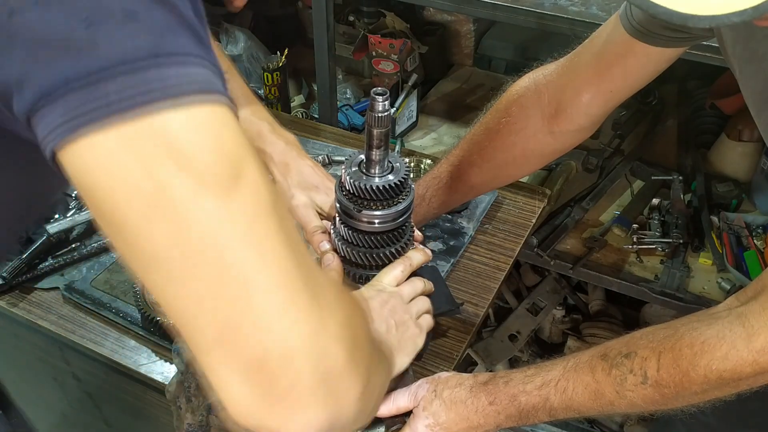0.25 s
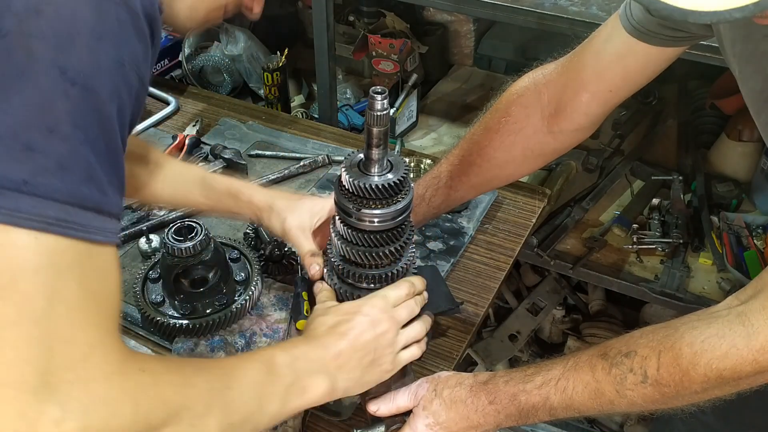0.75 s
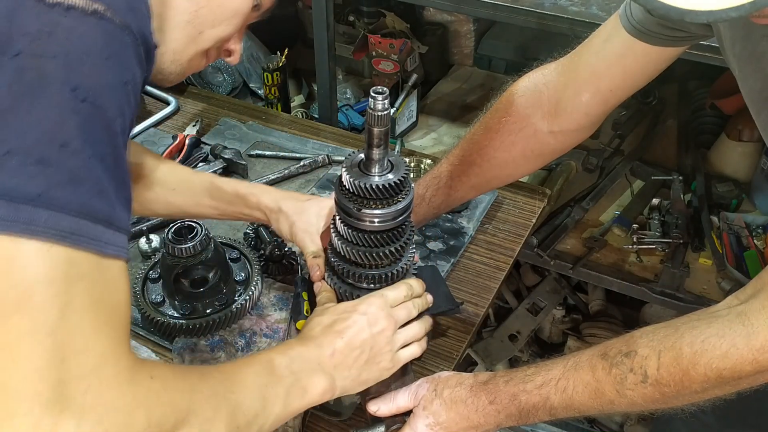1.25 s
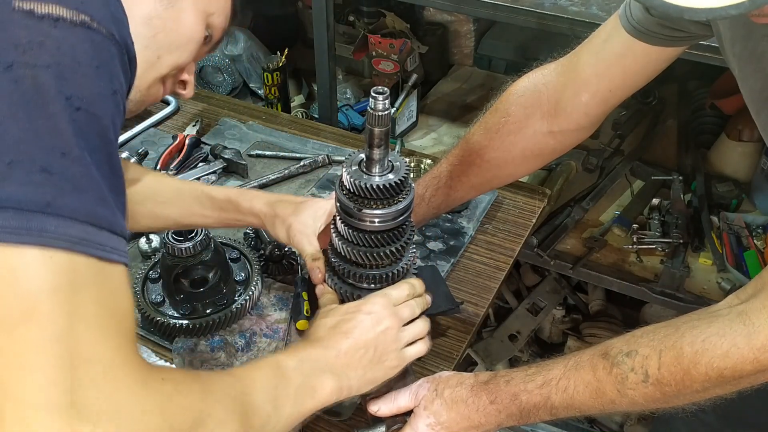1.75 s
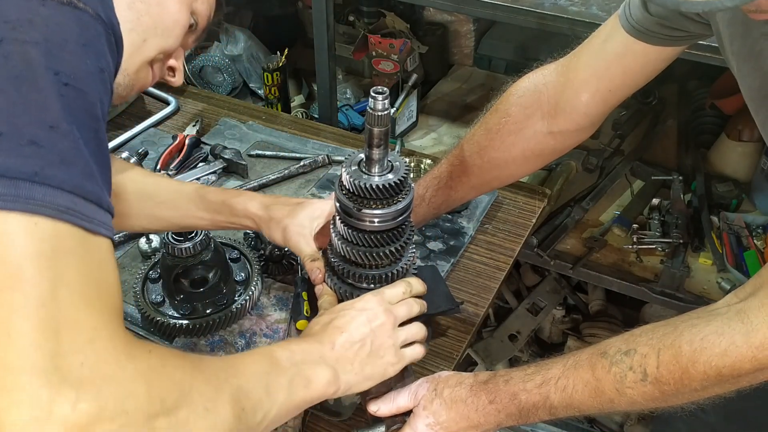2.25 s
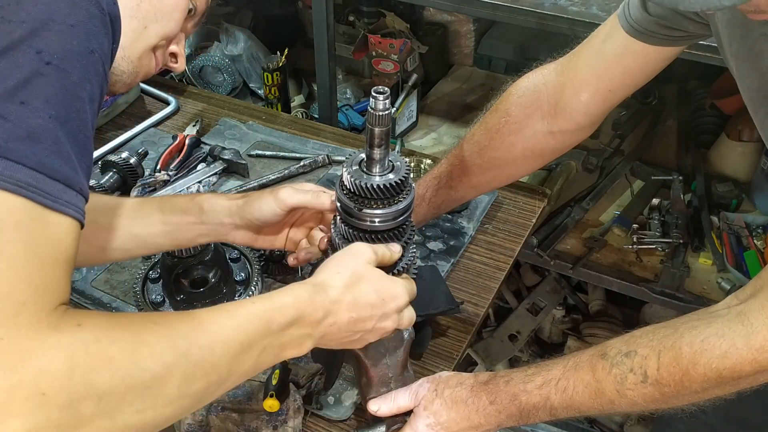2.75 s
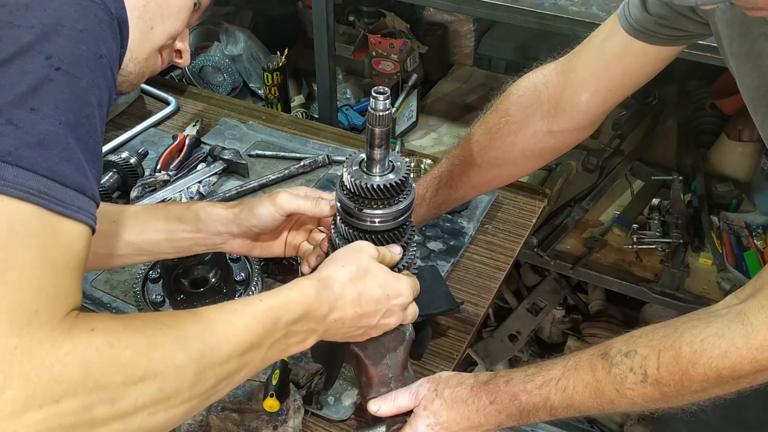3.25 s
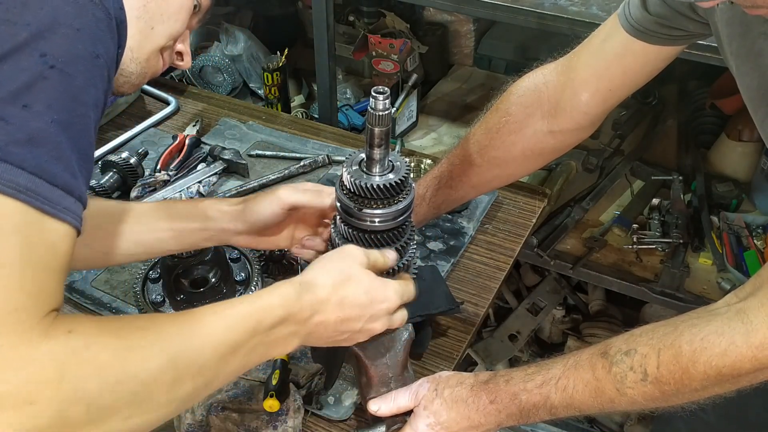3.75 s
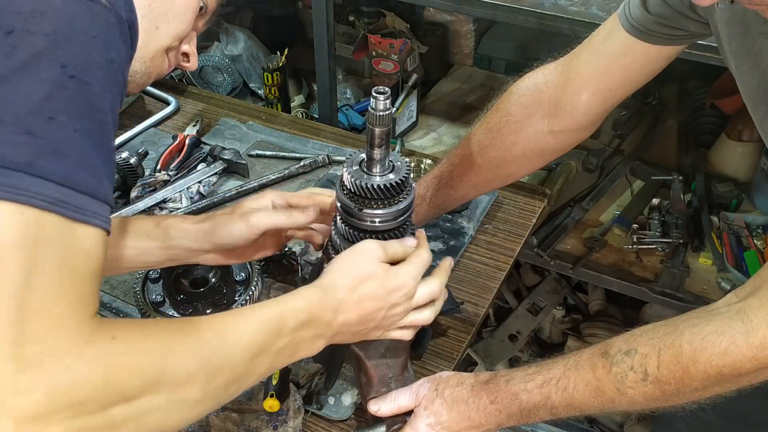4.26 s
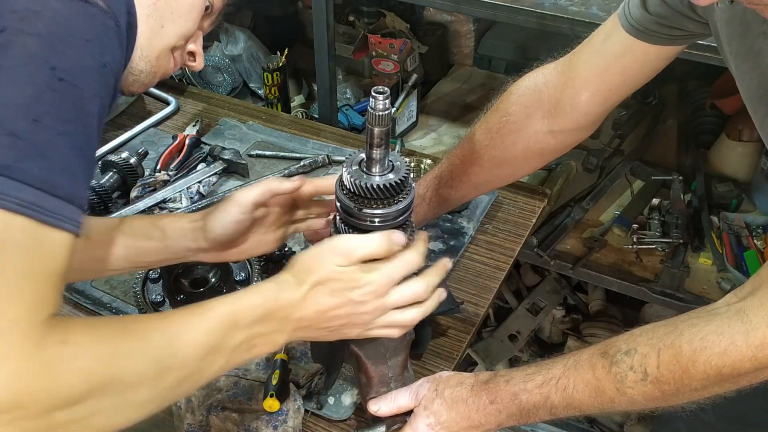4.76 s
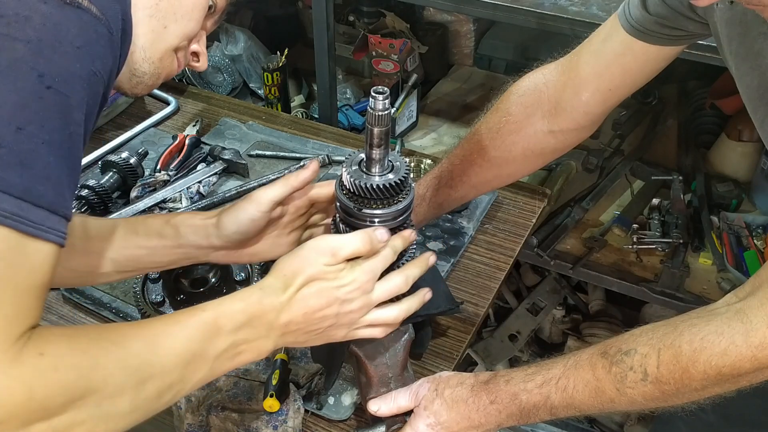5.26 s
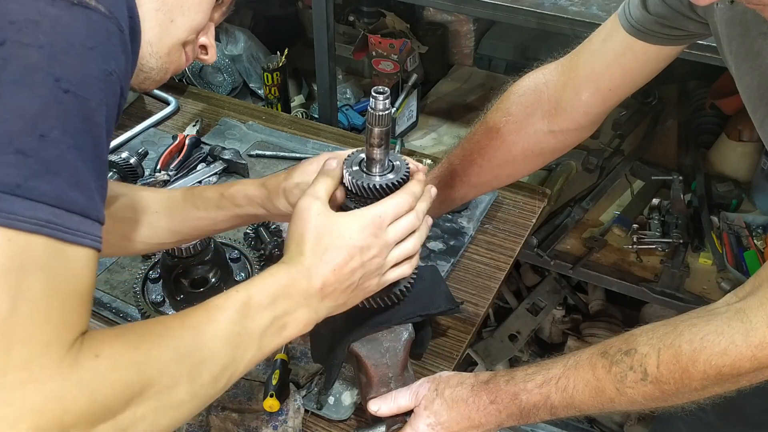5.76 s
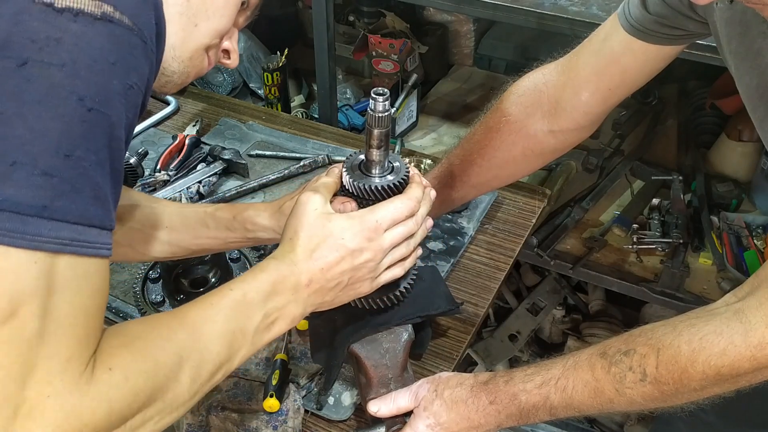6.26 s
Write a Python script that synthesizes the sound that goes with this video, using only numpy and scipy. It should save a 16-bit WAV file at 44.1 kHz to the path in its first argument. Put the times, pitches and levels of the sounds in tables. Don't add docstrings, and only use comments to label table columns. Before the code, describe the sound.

Close, sharp metal clinks with long quiet gaps: a snap, spaced knocks, a gear clank, a bright clack, ticks and a final stack slam.

```python
import sys
import numpy as np
from scipy import signal
from scipy.fft import rfft, irfft
from scipy.io import wavfile
from scipy.ndimage import uniform_filter1d

SR = 44100
rng = np.random.default_rng(int(sys.argv[2]) if len(sys.argv) > 2 else 0)


def int16_out(signal):
    q = np.round(np.clip(np.atleast_2d(signal).T, -1, 1) * 32767)
    wavfile.write(sys.argv[1], SR, q.astype(np.int16))


def to_linear_factor(level_db):
    exponent = np.asarray(level_db, float) / 20
    return 10 ** exponent


N = 286650
LEAD = 441

# hz, level_db, t60_s
BENCH_MODES = [(206, -8.5, 0.055), (470, 13.5, 0.066)]
# hz, level_db, t60_s
TOOTH_MODES = [(2240, -7, 0.017), (4440, -13, 0.013), (11800, -3, 0.021)]


def rms_one(x):
    return x / np.sqrt(np.mean(x ** 2) + 1e-20)


def at_hz(points, hz):
    point_hz, value = np.transpose(points)
    return np.interp(np.log(hz), np.log(point_hz), value)


def noise(spectrum, alike, low_hz):
    hz = np.arange(1, N // 2 + 2) * SR / N
    mid, side = rfft(rng.standard_normal((2, N))) * to_linear_factor(at_hz(spectrum, hz))
    likeness = np.clip(at_hz(alike, hz), 0, 1)
    pair = np.sqrt(1 + likeness) * mid + np.sqrt(1 - likeness) * side * [[1], [-1]]
    audible = irfft(pair * (hz > low_hz), N)
    return irfft(pair, N) / np.sqrt(np.mean(audible ** 2))


def pulse(spectrum, tilt_db, size=2048):
    hz = np.arange(1, size // 2 + 2) * SR / size
    level = np.log(to_linear_factor(at_hz(spectrum, hz) + tilt_db * np.log2(hz / 4000)))
    cepstrum = irfft(level, size)
    cepstrum[1:size // 2] *= 2
    cepstrum[size // 2 + 1:] = 0
    return irfft(np.exp(rfft(cepstrum)), size)


def chattering(chatter_s):
    bounces = rng.standard_normal(1024) * np.exp(-np.arange(1024) / SR / chatter_s)
    bounces[0] = 1.8
    spectrum = rfft(bounces, 2048)
    return irfft(spectrum / np.abs(spectrum))[:1024]


def strikes(contacts, crack, modes, chatter_s, lag, ring_share=0.39):
    late_s = .001
    out = np.zeros((2, N + LEAD + SR))
    t = np.arange(SR // 3) / SR
    hz, mode_db, t60 = np.transpose(modes)[:, :, None]
    phase = rng.uniform(-2.3, 1, (2, *hz.shape)) * np.clip(hz / 2500, 0, np.pi)
    for s, peak_db, pan_db, tilt_db, ring_db in contacts:
        hit = np.convolve(chattering(chatter_s), pulse(crack, tilt_db))
        strength_db = mode_db + ring_db + tilt_db * np.log2(hz / 4000)
        strength_db = strength_db + rng.normal(0, 1.5, (2, *hz.shape))
        pitch = hz * (1 + 0.00093 * rng.standard_normal(hz.shape))
        swing = np.exp((2j * np.pi * pitch - np.log(1000) / (ring_share * t60)) * t)
        start = (to_linear_factor(strength_db) * np.exp(1j * phase))[..., 0]
        sound = (start @ swing).imag * (1 - np.exp(-t / 0.0002))
        sound[:, :len(hit)] += hit / np.max(np.abs(hit))
        left_at = round((s + late_s) * SR) + LEAD + lag
        right_at = left_at - lag
        out[0, left_at:left_at + len(t)] += to_linear_factor(peak_db + pan_db) * sound[0]
        out[1, right_at:right_at + len(t)] += to_linear_factor(peak_db) * sound[1]
    return out[:, :N + LEAD]


def garage():
    # hz, t60_s
    walls = [(150, 0.34), (500, .23), (1500, .32), (4000, 0.3), (9000, 0.26), (14000, 0.18)]
    # delay_s, left_db, right_db
    echoes = [(.0042, -5, -7), (.0085, -3.5, -13), (0.01, -19, -21.5)]
    t, tail = np.arange(SR // 2) / SR, 0
    white = rng.standard_normal((2, 3, len(t)))
    for k, hz in enumerate(90 * 2 ** np.arange(0, 7.6, .5)):
        sos = signal.butter(2, [hz / 2 ** .25, hz * 2 ** .25], "band", fs=SR, output="sos")
        both, left, right = signal.sosfilt(sos, white[k % 2])
        shared = np.clip(200 / hz, 0, 1) ** .5
        band = shared * both + np.sqrt(1 - shared ** 2) * np.array([left, right])
        tail = tail + band * to_linear_factor(-60 * t / at_hz(walls, hz))
    tail = tail * (1 - np.exp(-(t / .0045) ** 2))
    clumps = rms_one(uniform_filter1d(rng.standard_normal(tail.shape), size=70))
    tail = tail * to_linear_factor(2.5 * clumps)
    tail = tail / np.sqrt(np.mean(np.sum(tail ** 2, axis=1)))
    for s, left_db, right_db in echoes:
        tail[:, round(s * SR)] += to_linear_factor([left_db, right_db])
    return tail


def ring_snap():
    # start_s, peak_db, left_right_db, bright_db_per_octave, ringing_db
    snap = [
        (-.007, -1, -0.5, -0.6, -9.5),
        (.0, -8, 2, -4.5, -17),
        (.002, -7.5, 3, 1, -15),
        (.0045, -11, 2.5, -1, -17.5),
        (.018, -15.5, -1, -1.5, -14.5),
        (.024, -19.5, -0.5, -1.5, -14.5),
        (.037, -16.5, 0, -1.2, -13.5),
    ]
    # hz, db_per_hz
    snap_crack = [(90, -44.5), (250, -30), (600, -28.5), (1200, -12.5), (1900, -24.5), (3000, -7.5),
                  (4600, -3), (6200, -11), (7600, -3.5), (8300, -12.5), (9100, 0), (10000, -26),
                  (16000, -25)]
    # hz, level_db, t60_s
    snap_modes = [(1200, -19.5, .2), (3219, -15, .08), (4250, -7, .06), (4300, -9.5, .08), (4764, -10, .06),
                  (4860, -8.5, 0.055), (5405, -12.5, 0.066), (6844, -14.5, .06), (7523, -4, .1),
                  (7730, 0, 0.15), (8858, -5.5, .08), (9006, -0.5, .1), (9290, 3, .08), (9270, -4.5, 0.082),
                  (10390, -16, .05), (10730, -14, 0.16), (11460, -18, 0.086), (12320, -18, .1),
                  (13200, -18.5, .12), (13500, -15, .1), (14200, -17, .12), (15650, -10, 0.11)]
    return strikes(snap, snap_crack, snap_modes, 0.0017, lag=2), 3.0


def hum():
    # time_s, hum_db
    load = [(0.0, -61.5), (2.41, -56), (6.5, -62)]
    # hz, width_hz, level_db
    booms = [(65, 14, 0), (82, 17, -1.5), (107.37, 3.2, 1)]
    motor_hz, motor_db = 434, -72.5
    start_s, stop_s, fade_s = 2.1, 2.5, 0.051
    white, out, t = rng.standard_normal((2, N)), 0, np.arange(N) / SR
    for hz, width_hz, level_db in booms:
        sos = signal.butter(2, [hz - width_hz / 2, hz + width_hz / 2], "band", fs=SR, output="sos")
        out = out + to_linear_factor(level_db) * signal.sosfilt(sos, white)
    mid, side = rms_one(out)
    rumble = (mid + 0.57 * side * [[1], [-1]]) * to_linear_factor([[1.1], [-1.1]])
    rumble = rumble * to_linear_factor(np.interp(t, *np.transpose(load)) + 0.5)
    running = np.clip(1 + np.minimum(t - start_s, stop_s - t) / fade_s, 0, 1)
    return rumble + to_linear_factor(motor_db) * running * np.sin(2 * np.pi * motor_hz * t)


def hiss():
    # hz, db_per_hz
    colour = [(15, -50.5), (25, -25.5), (45, -6), (97, 0), (130, -17), (185, -17), (218, -21), (264, -22.5),
              (418, -23), (478, -23.5), (627, -23), (2500, -32.5), (9930, -38.5), (16200, -44.5)]
    # hz, likeness (1 = same)
    likeness = [(60, 1), (180, 1), (550, 0.28), (1650, -0.048), (4970, -1.1), (15000, 0.13)]
    level_db = -64
    air = noise([(hz, min(db, -12.0)) for hz, db in colour], likeness, 84.0)
    return to_linear_factor(level_db) * air * to_linear_factor([[.6], [-.6]])


def hands():
    # hz, db_per_hz
    rub_colour = [(200, -15), (500, -6.5), (1500, -4), (2200, -3), (2900, -2), (5000, -3.5), (8000, -1.5),
                  (11000, -5), (16000, -12)]
    # firmest_s, length_s, rub_db, bright_db_per_octave
    strokes = [(0.338, 0.05, -64.5, -10.5), (0.403, 0.048, -53.5, 1.5), (0.465, 0.51, -59.5, 3),
               (0.611, 0.095, -54, -2), (0.789, 0.085, -53.5, -1.5), (1.003, 0.064, -51, 12.5),
               (1.04, 0.11, -49, -4), (2.954, 0.21, -65, -4.5), (4.107, 0.082, -71.5, 7.5),
               (4.31, 0.32, -74, 8.5), (4.617, 0.34, -70, 1), (4.945, 0.17, -73.5, 4),
               (5.834, 0.087, -73.5, 0), (6.014, 0.11, -65.5, -1.5)]
    grip_share = 0.39
    range_db = 21
    rub = noise(rub_colour, [(300, 1.0), (3000, 0.084), (12000, 0.07)], 2300.0)
    dull = signal.sosfilt(signal.butter(1, 4000, fs=SR, output="sos"), rub)
    grain = to_linear_factor(.9 * rms_one(uniform_filter1d(rng.standard_normal(N), size=200)))
    low, high, t = 0, 0, np.arange(N) / SR
    for s, length_s, rub_db, tilt_db in strokes:
        away = np.maximum((s - t) / grip_share, t - s) / length_s
        grip = to_linear_factor(rub_db - range_db * away)
        low = low + grip / to_linear_factor(tilt_db)
        high = high + grip * to_linear_factor(tilt_db)
    low, high = uniform_filter1d(low, size=600), uniform_filter1d(high, size=600)
    return (low * dull + high * (rub - dull)) * grain


def bench_thuds():
    # start_s, peak_db, left_right_db, bright_db_per_octave, ringing_db
    thuds = [
        (.603, -48, 1.9, 1, -16),
        (2.545, -55.5, 1.5, -0.17, -39),
        (3.312, -35.5, 0.65, -0.37, -23),
        (3.47, -55, 1.5, 0.21, -30),
    ]
    # hz, db_per_hz
    thud_crack = [(70, -48.5), (140, 1), (220, 10.5), (450, -2.5), (750, -2), (1500, -9.5), (5000, -48.5)]
    return strikes(thuds, thud_crack, BENCH_MODES, 0.00096, lag=1), 1.5


def ring_rocking():
    # start_s, peak_db, left_right_db, bright_db_per_octave, ringing_db
    rocks = [
        (.9095, -44, -0.45, -0.87, -4),
        (1.2012, -28.5, -0.45, 1, -14.5),
        (1.4908, -28, .3, -0.4, -14.5),
        (1.7658, -32, .3, 1, -10),
        (2.0433, -37.5, -.4, .3, -16),
    ]
    # start_s, peak_db, left_right_db, bright_db_per_octave, ringing_db
    rocks_back = [
        (1.351, -44, 0.22, -5.5, -19.5),
        (1.617, -45, 1.6, -4, -17.5),
        (1.631, -48, 1.1, -3.5, -22),
        (1.923, -46, 1.5, -3, -20),
    ]
    # hz, db_per_hz
    rock_crack = [(180, -25), (500, -12), (1100, -4.5), (2300, -6), (3400, -7), (4500, 6), (5600, -7),
                  (7500, -16), (10200, -38), (16000, -29)]
    # hz, level_db, t60_s
    rock_modes = [(1080, -8, 0.035), (2620, -3, 0.046), (2830, -2, 0.055), (2946, 1.5, 0.046),
                  (3160, 4, 0.044), (3800, 9.5, 0.031), (4210, 9.5, 0.015), (4660, 9, 0.019),
                  (4990, 6, 0.016), (5360, -7, 0.024), (7380, -7.5, 0.034), (7480, -3, 0.038),
                  (9130, -8.5, 0.19)]
    # hz, db_per_hz
    seat_crack = [(300, -8), (700, -5.5), (1150, 3.5), (1900, -8), (4000, -6.5), (9000, -35.5)]
    seat_s, seat_loss_db = .008, 11
    seats = [(s + seat_s, peak_db - seat_loss_db, pan_db, 0, -40) for s, peak_db, pan_db, *_ in rocks]
    return [(strikes(rocks, rock_crack, rock_modes, 0.00077, lag=1), -4.5),
            (strikes(seats, seat_crack, BENCH_MODES, 0.0013, lag=1), -1.5),
            (strikes(rocks_back, rock_crack, rock_modes, 0.0014, lag=1), 3.5)]


def gear_nudge():
    # start_s, peak_db, left_right_db, bright_db_per_octave, ringing_db
    nudge = [
        (2.539, -37, 1.4, -1.27, -9),
        (2.546, -46, 1.5, 4, -14),
        (2.558, -44, .6, -2.3, -16),
        (2.572, -36, 1, -9.5, -17),
        (2.589, -35.5, 0.96, 0.4, -24),
        (2.597, -37, 1, -1.5, -14),
        (2.609, -31.5, 1.5, 3.5, 0),
    ]
    # hz, db_per_hz
    nudge_crack = [(76, -2), (140, 7), (430, 2.5), (1300, -10.5), (3000, -3.5), (4900, -14), (6300, -10),
                   (7400, -23), (10000, -28), (13000, -35), (16000, -31.5)]
    # hz, level_db, t60_s
    nudge_modes = [(430, -6.5, .12), (1600, -2, 0.04), (1960, -4, 0.04), (2800, -23, 0.052),
                   (3160, 0, 0.06), (3820, -10, 0.042), (4890, 1, 0.045), (7435, -2, 0.084),
                   (8060, -5.5, 0.09), (9100, -15, 0.081), (10000, -15, .07), (10440, -14, 0.083),
                   (12413, -15, .05), (15320, -17.5, .05)]
    return strikes(nudge, nudge_crack, nudge_modes, 0.002, lag=4), 3.5


def gear_clank():
    # start_s, peak_db, left_right_db, bright_db_per_octave, ringing_db
    clank = [
        (2.634, -18.5, 3, 0.22, -6),
        (2.644, -11.5, 1.5, 0.94, -18.5),
        (2.666, -22.5, 0.5, -1.5, -6.5),
    ]
    # hz, db_per_hz
    clank_crack = [(60, -23), (150, 0.5), (300, -5), (540, 3.5), (900, -13.5), (1400, -8), (3200, -9.5),
                   (4000, -21.5), (6500, -19), (9500, -23), (16000, -31.5)]
    # hz, level_db, t60_s
    gear_modes = [(433, -20, 0.37), (555, -8.5, 0.11), (1323, 0.5, 0.053), (1616, -17.5, 0.38),
                  (1865, -15, .1), (2170, -15, 0.3), (2212, -10, 0.347), (2900, -17, .12),
                  (3075, -2.5, .15), (3210, -7, 0.11), (3726, -11, 0.086), (4190, -7, 0.095),
                  (4890, -15, 0.15), (5500, -16, 0.11), (5870, -5, 0.21), (5890, -18.5, .14),
                  (5880, -17, .1), (7410, -17, 0.084), (8200, -16, 0.17), (8860, -16, 0.2),
                  (9109, -17, 0.22), (9270, -14, 0.15), (9900, -3, 0.17), (10370, -9.5, 0.16),
                  (11130, -13, 0.12), (12725, -13, .13), (13260, -13.5, 0.12), (13980, -21.5, 0.12),
                  (14540, -21.5, .1), (15500, -16, .035)]
    return strikes(clank, clank_crack, gear_modes, 0.004, lag=4, ring_share=0.82), -1.5


def light_touches():
    # start_s, peak_db, left_right_db, bright_db_per_octave, ringing_db
    touches = [
        (3.073, -46, 1.2, -1.9, -5.5),
        (3.237, -55, 1.14, 0.84, -14),
        (6.337, -37.5, 0.63, -0.65, -23),
    ]
    # hz, db_per_hz
    touch_crack = [(900, -44), (2500, -15.5), (4200, 3), (6000, -8), (8000, 0.5), (10000, -14), (12500, -7),
                   (16000, -27.5)]
    return strikes(touches, touch_crack, TOOTH_MODES, 0.00067, lag=1), 3.5


def sleeve_clack():
    # start_s, peak_db, left_right_db, bright_db_per_octave, ringing_db
    clack = [
        (3.2918, -6, 4.0, 0.67, -12),
        (3.297, -8, 3.6, .6, -18.5),
        (3.301, -3.5, 2.6, 0.55, -22),
        (3.318, -26.5, 3.0, -0.72, -22.5),
    ]
    # hz, db_per_hz
    clack_crack = [(150, -37.5), (500, -34.5), (1200, -19), (2200, -23.5), (3500, -11.5), (5200, -17.5),
                   (7000, -4), (9500, 3.5), (12000, -3), (14500, -6), (16000, -4)]
    # hz, level_db, t60_s
    sleeve_modes = [(3570, -13, 0.16), (3840, -16, 0.07), (4129, -11, 0.15), (4540, -13, 0.2),
                    (5040, -12.5, 0.08), (5580, -12, 0.06), (5846, -12, 0.15), (6300, -12, .12),
                    (6702, -11.5, .1), (6918, -8.5, 0.16), (7270, -8, 0.12), (8350, -4.5, 0.065),
                    (8632, -3, 0.07), (8700, 12, 0.0077), (8750, 0.5, .07), (9800, 0.5, 0.14),
                    (9625, -6, .08), (10257, -1.5, 0.09), (10180, -3.5, .07), (11160, -3, 0.065),
                    (13670, -9.5, 0.097), (13800, -13, .08)]
    return strikes(clack, clack_crack, sleeve_modes, 0.003, lag=1, ring_share=0.35), -1.5


def sleeve_settle():
    # start_s, peak_db, left_right_db, bright_db_per_octave, ringing_db
    settle = [
        (3.463, -30.5, 3.43, 0.34, -3.5),
    ]
    # hz, db_per_hz
    settle_crack = [(500, -30), (1500, -17.5), (3500, 0), (6000, -6.5), (11000, -1), (12500, -25),
                    (16000, -25.5)]
    # hz, level_db, t60_s
    settle_modes = [(3300, -18, 0.02), (6200, 3.5, 0.022), (9300, -7, 0.034), (11430, -4, 0.074),
                    (15550, -8, 0.032)]
    return strikes(settle, settle_crack, settle_modes, 0.00147, lag=1), 0.5


def tooth_tap():
    # start_s, peak_db, left_right_db, bright_db_per_octave, ringing_db
    tap = [
        (4.149, -46, 1.6, 0.48, -24.5),
    ]
    # hz, db_per_hz
    tap_crack = [(900, -33), (1800, -16), (2300, 4), (3300, -6.5), (5000, -14.5), (9000, -15), (16000, -30)]
    return strikes(tap, tap_crack, TOOTH_MODES, 0.0016, lag=1), 4.5


def tooth_ticks():
    # start_s, peak_db, left_right_db, bright_db_per_octave, ringing_db
    ticks = [
        (5.095, -23, 3.4, -1.58, -7.5),
        (5.291, -16, 3.34, 0.75, -8),
    ]
    # hz, db_per_hz
    tick_crack = [(400, -38), (1200, -19.5), (2300, -16), (3300, -11.5), (4700, -6), (7500, -1), (9500, -4),
                  (11800, -2.5), (13500, -13.5), (16000, -10)]
    return strikes(ticks, tick_crack, TOOTH_MODES, 0.00015, lag=1), -2.5


def stack_slam():
    # start_s, peak_db, left_right_db, bright_db_per_octave, ringing_db
    slam = [
        (6.3462, -2, 3.2, .3, -6.5),
        (6.354, -2.5, 1.3, 0.43, -11.5),
        (6.361, -2, 1.7, -1.2, -25),
        (6.371, -12.5, 1.2, -0.072, -13),
        (6.386, -13.5, 1.7, 0, -12),
        (6.395, -16.5, 1.7, 0, -14),
        (6.402, -15, 1.5, -0.24, -12.5),
        (6.417, -19.5, 3.4, 0, -16.5),
        (6.444, -27.5, 1.6, .3, -14),
    ]
    # hz, db_per_hz
    slam_crack = [(60, -53.5), (200, -18), (600, -12.5), (1200, -10.5), (2100, -12), (3500, -3), (5500, -7),
                  (6800, -2.5), (8200, -16.5), (9300, -1), (10200, -14.5), (11200, -6.5), (16000, -24.5)]
    # hz, level_db, t60_s
    stack_modes = [(3200, -11.5, .07), (3499, -5.5, 0.1), (3830, -10.5, 0.029), (4449, -9, 0.06),
                   (4730, -9.5, 0.031), (5246, -11, .05), (5749, -11.5, 0.017), (6473, -8, .04),
                   (6675, -8, 0.039), (7240, -5.5, 0.064), (7590, -18.5, .06), (9070, -5.5, 0.14),
                   (9230, -4, 0.15), (9287, -2, 0.14), (9496, -4.5, 0.08), (9746, -9, 0.026),
                   (11600, -11, 0.035), (11030, -4.5, .05), (12650, -15.5, .05), (13600, -18, 0.033)]
    return strikes(slam, slam_crack, stack_modes, 0.0012, lag=2), 2.2


def parts():
    kinds = [ring_snap(), bench_thuds(), *ring_rocking(), gear_nudge(), gear_clank(), light_touches(),
             sleeve_clack(), sleeve_settle(), tooth_tap(), tooth_ticks(), stack_slam()]
    direct = sum(sound for sound, room_db in kinds)
    sent = sum(sound * to_linear_factor(room_db) for sound, room_db in kinds)
    wet = signal.fftconvolve(sent, garage(), axes=1)[:, :N + LEAD]
    return (direct + wet)[:, LEAD:]


def scene():
    return parts() + hands() + hum() + hiss()


def roll_off(x):
    return signal.sosfilt(signal.butter(12, 16060, fs=SR, output="sos"), x)


def record(dry):
    heard = signal.sosfilt(signal.butter(2, 36, "high", fs=SR, output="sos"), dry)
    heard = .85 * np.tanh(heard / .85)
    heard = signal.sosfilt(signal.cheby2(12, 60, 16900, fs=SR, output="sos"), heard)
    return roll_off(heard)


dry = scene()
out = record(dry)
int16_out(out)
```